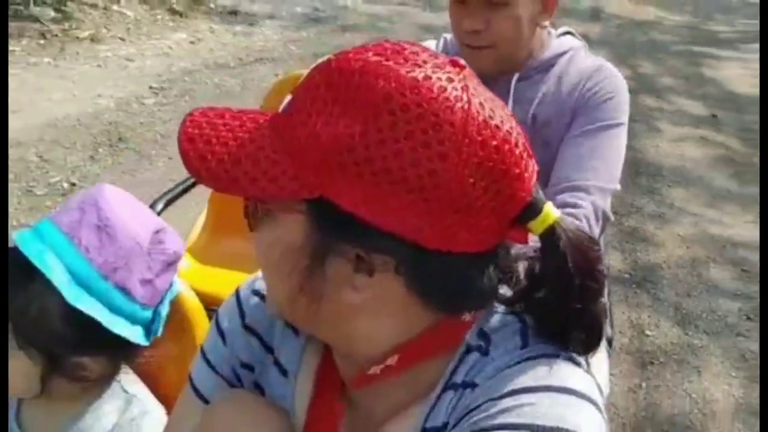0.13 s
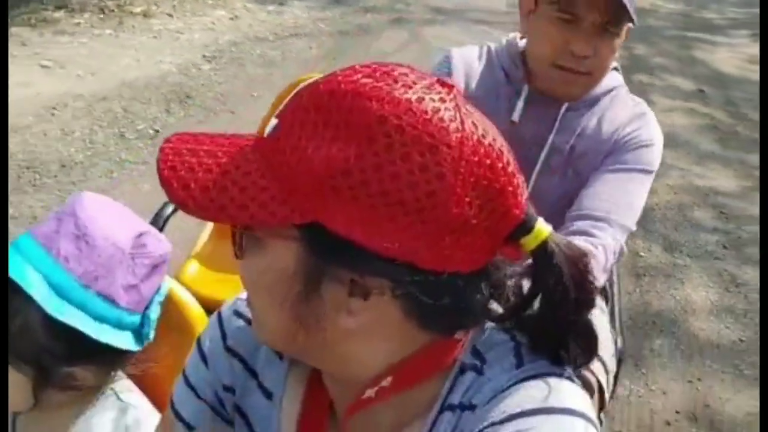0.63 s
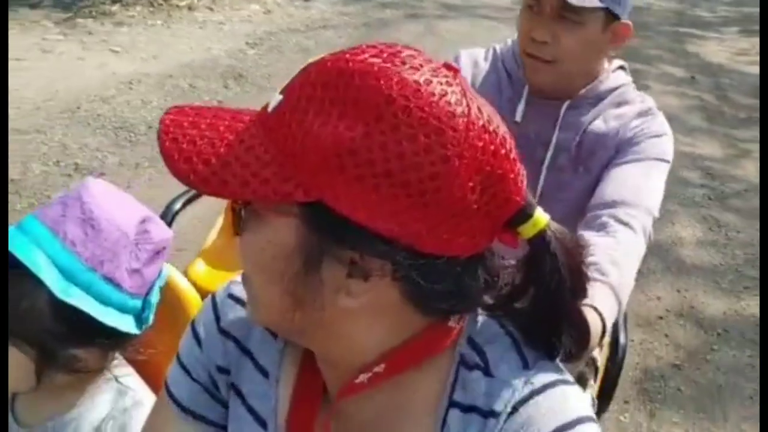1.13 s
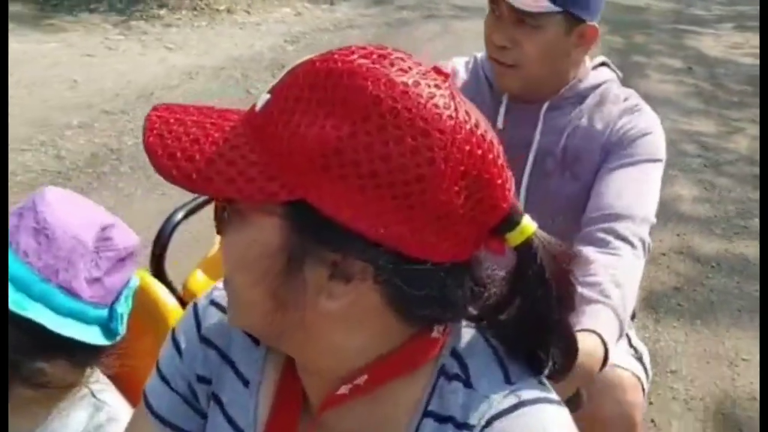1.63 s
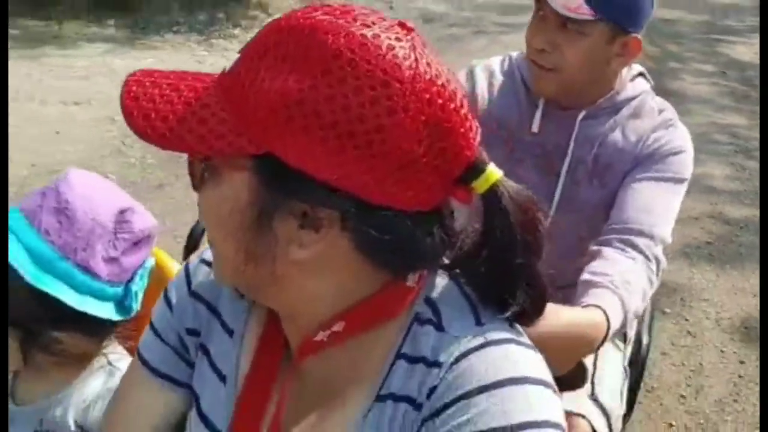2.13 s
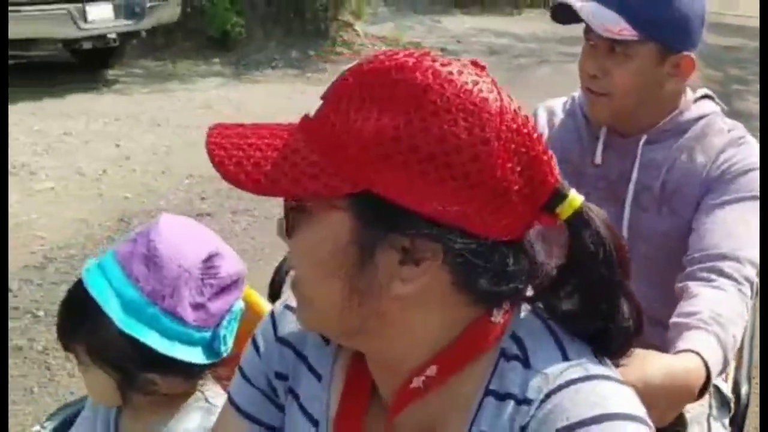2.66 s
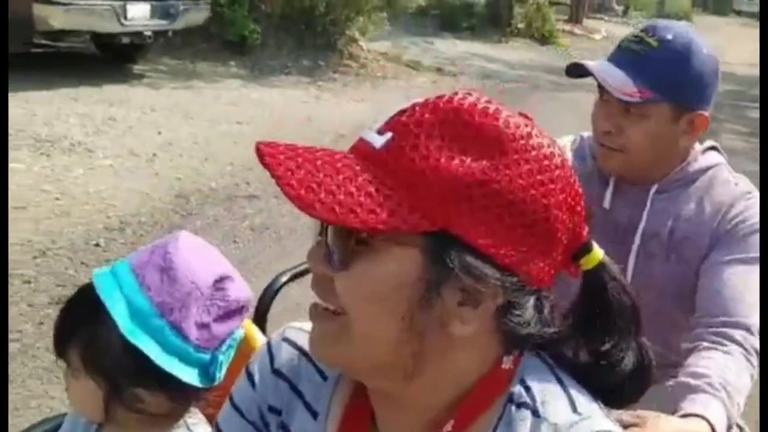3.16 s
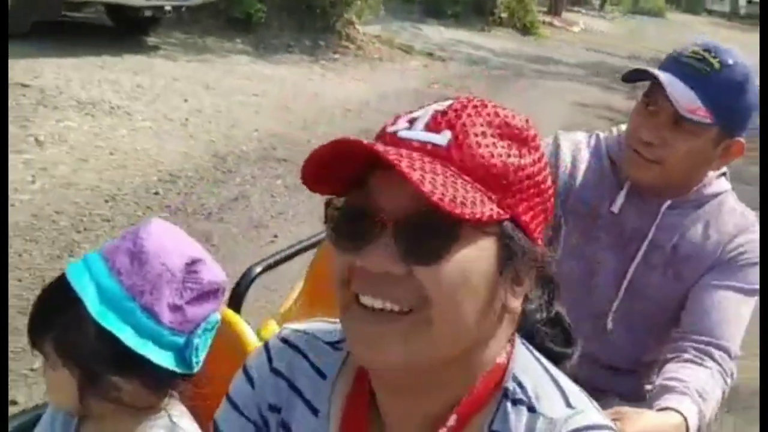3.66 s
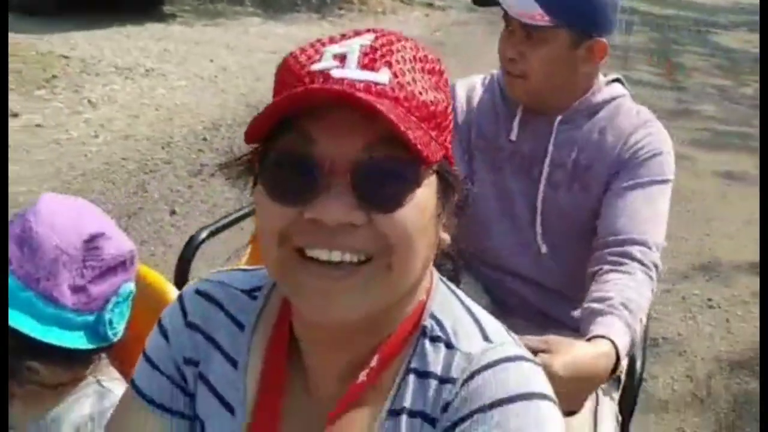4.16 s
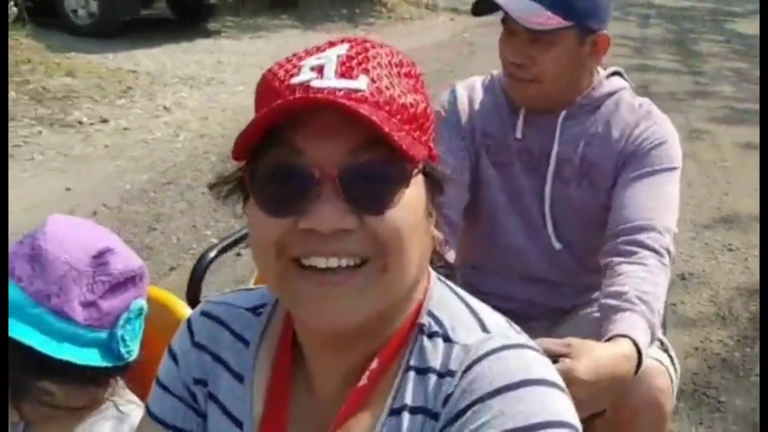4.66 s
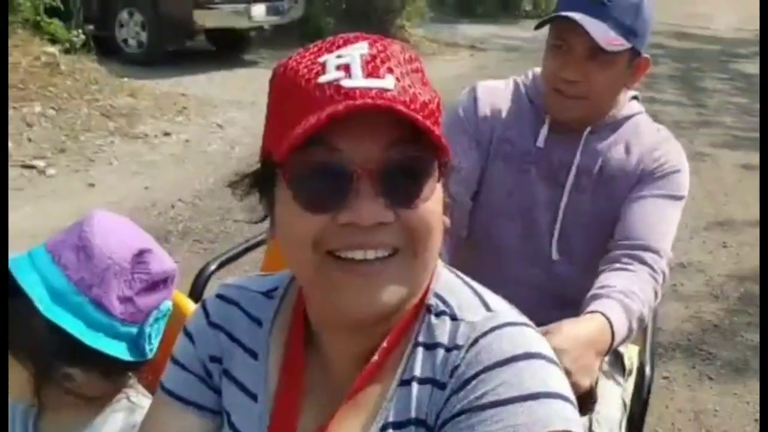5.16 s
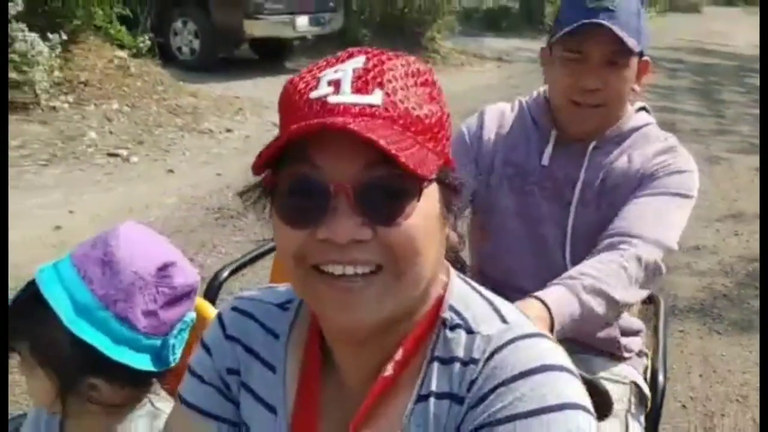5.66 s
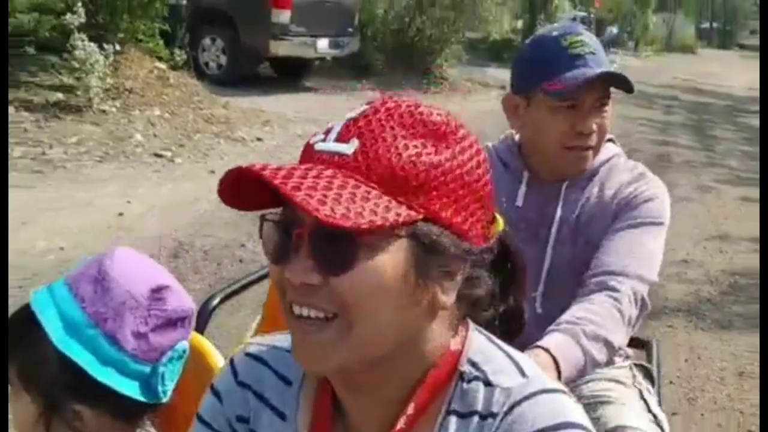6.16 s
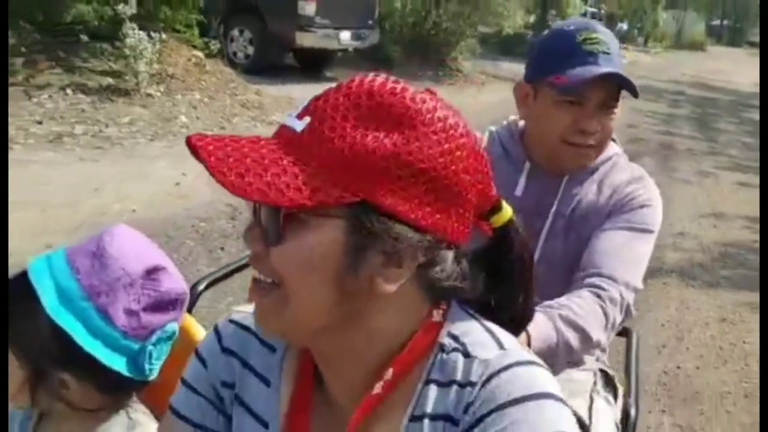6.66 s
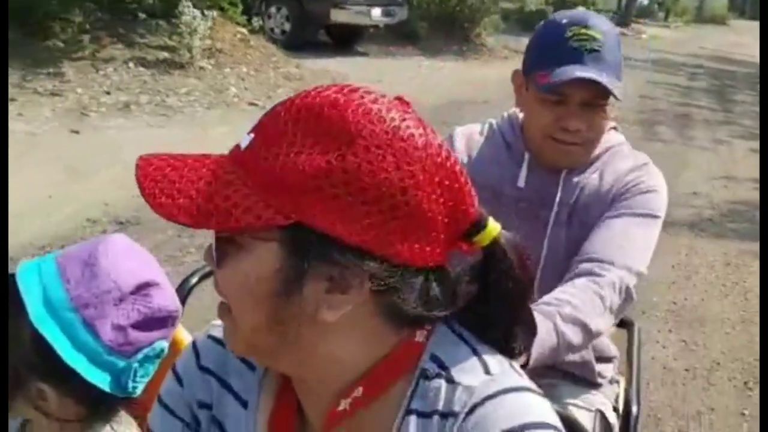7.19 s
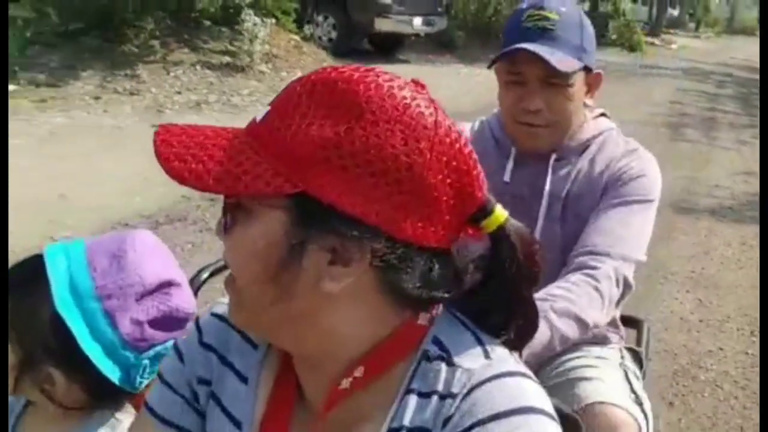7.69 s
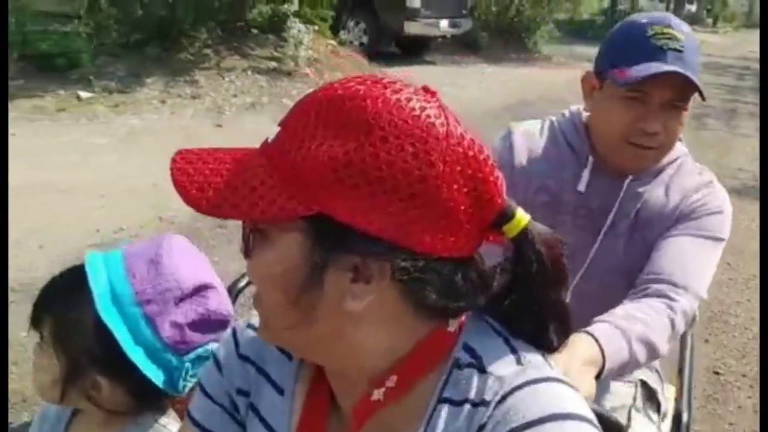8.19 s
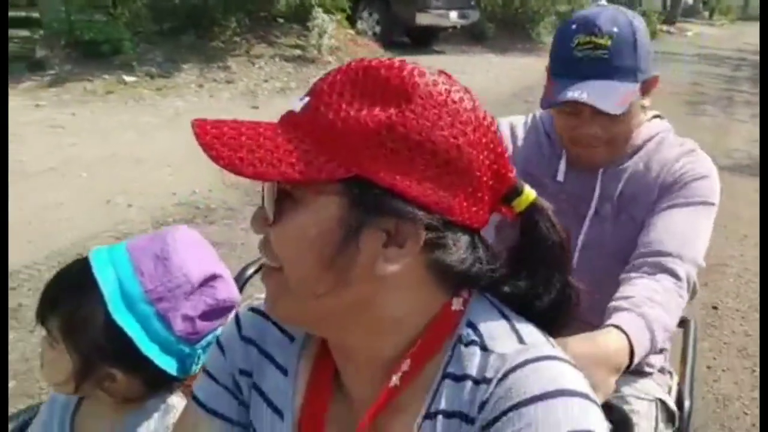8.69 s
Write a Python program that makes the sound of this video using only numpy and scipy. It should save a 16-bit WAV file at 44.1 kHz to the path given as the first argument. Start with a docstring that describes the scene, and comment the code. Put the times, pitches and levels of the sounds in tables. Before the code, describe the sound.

Heard on board a pedal cart in open air, tyres grind softly over gravel with a fine steady crunch. Stones pop and knock, and loose metal rattles lightly at first. Thin high squeaks return about every second and a half. After five seconds the clanks become harder and wind thumps the handheld microphone, mostly on the left. A clear squeal comes near the end, followed by more heavy rattles.

```python
"""Pedal cart on a gravel road

A pedal cart rolls over gravel in open air, heard close, from a hand-held phone on board. Tyres press noise
and damped pings out of the stones, larger stones pop, loose parts rattle and ring over bumps, and dry joints
squeak by stick-slip. Wind, low lumpy noise and short thumps, buffets mostly the left microphone.
The right channel arrives about 4 ms late, and the top of the treble comes and goes."""
import sys
import numpy as np
from scipy import signal
from scipy.fft import rfft, irfft, next_fast_len
from scipy.io import wavfile
from scipy.ndimage import uniform_filter1d, map_coordinates

SR = 44100
rng = np.random.default_rng(int(sys.argv[2]) if len(sys.argv) > 2 else 0)


def put_to_file(sound):
    """Save the sound as 16-bit audio at rate SR, in the file named by the first command-line argument."""
    columns = np.atleast_2d(sound).T  # one column per channel
    safe = np.clip(columns, -1, 1)
    whole_steps = np.round(safe * 32767)
    wavfile.write(sys.argv[1], SR, whole_steps.astype(np.int16))


def volts(x):
    """Linear amplitude factor 10**(x/20) for a level x in dB, scalar or array-like."""
    e = np.asarray(x, float) / 20
    return 10 ** e


N = 388962
T = np.arange(N) / SR


def unit(x):
    """Scaled to rms 1."""
    return x / np.sqrt(np.mean(x ** 2) + 1e-20)


def along(points, hz):
    """(Hz, value) points read on a log frequency axis."""
    point_hz, value = np.transpose(points)
    return np.interp(np.log(hz + 1), np.log(point_hz + 1), value)


def wobble(rate):
    """A smooth random curve, rate knots a second."""
    knots = rng.standard_normal(int(N * rate / SR) + 4)
    return map_coordinates(knots, [T * rate])


def filtered(x, response):
    """x times a complex response of frequency."""
    m = next_fast_len(N + 8192)
    return irfft(rfft(x, m) * response(np.fft.rfftfreq(m, 1 / SR)), m)[..., :N]


def rush(spectrum, alike, patchy_db):
    """Two-channel noise of rms 1, partly shared between the microphones, in narrow patches of random gain."""
    z = signal.stft(rng.standard_normal((2, N)), nperseg=512)[2]
    field = uniform_filter1d(rng.standard_normal(z.shape[1:]), size=3, axis=0)
    field = uniform_filter1d(field, size=6, axis=1)
    pair = signal.istft(z * volts(patchy_db * unit(field)), nperseg=512)[1][:, :N]

    def mid_side(hz):
        turn = np.arccos(np.clip(along(alike, hz), 0, 1)) / 2  # this split makes the correlation equal alike
        return volts(along(spectrum, hz)) * [np.cos(turn), np.sin(turn)]

    mid, side = filtered(pair, mid_side)
    return unit(np.array([mid + side, mid - side]))


def add(track, s, sound):
    """Mixes a short sound in at time s."""
    i = int(np.clip(round(s * SR), 0, N))
    track[..., i:i + sound.shape[-1]] += sound[..., :N - i]


def panned(db):
    """Gains of the two channels for a left-right difference."""
    return volts([[db / 2], [-db / 2]])


def pings(s, db, hz, cycles, pan_db):
    """Damped sines, one per stone; each microphone hears its own slightly different pitch."""
    t = np.arange(560) / SR
    out = np.zeros((2, N + len(t)))
    start = np.clip(s * SR, 0, N - 1).astype(int)
    at = (start[:, None] + np.arange(len(t))).ravel()
    detune = 1 + 0.045 * rng.standard_normal((len(s), 2))
    for c in (0, 1):
        turns = (hz * detune[:, c])[:, None] * t
        shape = np.sin(2 * np.pi * turns) * np.exp(-turns / cycles[:, None]) * (1 - np.exp(-3 * turns))
        gain = volts(db + (.5 - c) * pan_db)[:, None]
        out[c] = np.bincount(at, (gain * shape).ravel(), N + len(t))
    return out[:, :N]


def scattered(count, rolling_db, db, hz, cycles):
    """Random pings that follow the rolling level: many small, few large."""
    draw, when = rng.standard_normal((count, 3)), rng.random((count, 2))
    at = when[:, 0] * N / SR
    size_db = np.interp(at, T, rolling_db) + db - 2.53 * np.log(1.01 - when[:, 1])
    pitch_hz = np.minimum(hz * np.exp(.55 * draw[:, 0]), 8400)
    return pings(at, size_db, pitch_hz, cycles * np.exp(0.34 * draw[:, 1]), 1.8 * draw[:, 2])


# Tyres on the gravel. Each row: time in seconds, mean drone level in dB, mean fine crunch level in dB.
ROLLING = [(0.0, -45, -51), (0.37, -49, -50), (0.6, -45, -49), (0.9, -51, -53), (1.4, -52, -51),
           (2.0, -48, -54), (2.18, -46, -47), (2.35, -52, -55), (3.1, -49, -52), (3.4, -51, -54),
           (3.75, -48, -49), (4.0, -50, -52), (4.4, -46, -49), (4.6, -49, -51), (5.2, -49, -46),
           (5.6, -46, -50), (5.9, -49, -53), (6.6, -48, -51), (7.2, -52, -51), (7.38, -44, -47),
           (7.55, -50, -53), (8.1, -43, -47), (8.65, -49, -54), (8.82, -41, -49)]
# Spectra of the tyre drone and the fine crunch. Each row: frequency in Hz, relative level in dB per Hz.
DRONE_SPECTRUM = [(71, -70), (125, -11), (190, -3), (288, -2), (506, 1.5), (608, -15), (983, -2.5),
                  (1120, -6.5), (1700, -2), (3500, -38), (4550, -66), (7700, -120)]
CRUNCH_SPECTRUM = [(880, -15), (1500, -2.5), (1720, -18), (2140, -7.5), (2780, -4.5), (3500, -8.5),
                   (5510, -15.5), (8150, -7), (9260, -46.5), (10300, -18), (11800, -29), (12600, -53),
                   (13200, -71)]
# Likeness of noise at the two microphones. Each row: frequency in Hz, correlation from 0 to 1.
ALIKENESS = [(100, 0.9), (300, 1), (600, 0.46), (1200, 0.1), (2500, 0.47), (6000, 0.45), (12000, 0.4)]


def gravel():
    """Tyres press the stones: a lumpy drone, a fine crunch, small pops, and faint tinkles of shaken metal."""
    s, drone_db, crunch_db = np.transpose(ROLLING)
    bumps = wobble(13)
    drone_db = np.interp(T, s, drone_db) + 1.4 * bumps
    crunch_db = np.interp(T, s, crunch_db) + 0.5 * bumps
    drone = volts(drone_db + 2.36 * wobble(60)) * rush(DRONE_SPECTRUM, ALIKENESS, patchy_db=4.5)
    crunch_gain = volts(crunch_db + 1.75 * wobble(30) + 0.5 * wobble(300))
    crunch = crunch_gain * rush(CRUNCH_SPECTRUM, ALIKENESS, patchy_db=4.5)
    clumps_db = drone_db + 2.1 * wobble(5.8)
    stones = scattered(count=1600, rolling_db=clumps_db, db=1.0, hz=1100, cycles=3.0)
    tinkles = scattered(count=900, rolling_db=crunch_db, db=-8.0, hz=4017, cycles=42)
    return drone + crunch + stones + tinkles


# Steady wind on the microphones. Each row: time in seconds, buffet level in dB before lumps and panning.
STEADY_WIND = [(0.0, -75), (1.0, -77), (1.7, -80), (2.4, -74), (2.9, -71), (3.6, -79), (4.0, -70),
               (4.3, -57), (4.6, -71), (5.0, -64), (5.3, -56), (5.9, -62), (6.5, -54), (6.9, -62),
               (7.15, -62), (7.5, -57), (8.0, -65), (8.82, -68)]
# Puffs of wind. Each row: thump start in seconds, nominal level in dB, thump pitch in Hz,
# hold of the roar in seconds.
WIND_PUFFS = [(3.174, -43, 78.1, .04), (4.198, -41, 126, .1), (5.127, -38, 124, .05),
              (5.232, -33, 159, .05), (5.309, -29.5, 88, .04), (5.465, -38, 137, .08),
              (5.975, -45, 242, .03), (6.147, -26, 200, .04), (6.182, -31, 158, .04), (6.35, -46, 110, .04),
              (6.461, -33, 99.6, .05), (6.548, -35, 154, .07), (6.99, -46, 110, .03),
              (7.215, -39, 104, .06), (7.41, -42, 110, .04), (7.485, -39, 110, .03), (7.57, -42, 125, .05),
              (7.791, -41, 113, .12), (8.222, -33, 135, .05), (8.39, -44, 110, .05), (8.54, -48, 110, .04)]
# Spectrum of the buffeting. Each row: frequency in Hz, relative level in dB per Hz.
BUFFET_SPECTRUM = [(12, -53), (20, -6), (92, 7), (130, 1), (225, -4), (253, -1), (350, -20.5), (460, -46),
                   (770, -120)]
ROAR_DB, ROAR_RISE_S, ROAR_FALL_DB_PER_S = -13, .015, 500  # roar re nominal puff level, its swell and fall


def wind():
    """Air tumbles over the ports in lumps, nearly unrelated left and right; puffs roar and thump the left one."""
    strength = volts(np.interp(T, *np.transpose(STEADY_WIND)) + 3.5 * wobble(12))
    t = np.arange(SR // 3) / SR
    thumps = np.zeros(N)
    for s, db, hz, hold_s in WIND_PUFFS:
        swing = np.sin(2 * np.pi * hz * t) * hz * t * np.exp(1 - 1.6 * hz * t)
        add(thumps, s, volts(db + 13) * swing)
        fall_db = ROAR_FALL_DB_PER_S * np.maximum(t - ROAR_RISE_S - hold_s, 0)
        roar = np.minimum(t / ROAR_RISE_S, 1) * volts(db + ROAR_DB - fall_db)
        add(strength, s - ROAR_RISE_S, roar)
    lumps = volts(3.2 * np.array([wobble(35), wobble(35)]))
    noise = unit(lumps * rush(BUFFET_SPECTRUM, [(50, 0.092)], patchy_db=0.5))
    return strength * noise * panned(14.2) + thumps * [[1], [.15]]


def ringing(modes, t):
    """Modes at new strengths for each blow; each is a close pair that beats, heard differently left and right."""
    ring = np.zeros((2, len(t)))
    for hz, db, t60 in modes:
        split, turn = 1 + 0.0204 * rng.standard_normal(), 2 * np.pi * rng.random((2, 1))
        pair = np.sin(2 * np.pi * hz * t) + 1.32 * np.sin(2 * np.pi * hz * split * t + turn)
        ring += volts(db + rng.normal(0, 1.2) - 60 * t / t60) * pair
    ending = np.minimum(1, 8 - 8 * t / t[-1])
    return (1 - np.exp(-t / 0.0047)) * ending * ring


# Clanks of loose parts. Each row: start in seconds, nominal level in dB, then body, sizzle and hollow boom
# in dB re that level, all before the trims of the layers.
CLANK_BLOWS = [(0.003, -31, -6, -26, -10), (0.3526, -48, 7, -1, -20), (0.6868, -26, -5.5, -15, -6.5),
               (0.999, -43, 1, -5.5, -3), (1.0505, -36, -2, -12, -6.5), (1.0885, -41, 4, -10, -4),
               (1.1278, -46, -9, 3.5, -10), (1.3349, -49, 2, 4, -26), (1.4586, -39, 5.5, -18, -21),
               (1.5572, -29.5, 0, -11, -6), (1.6526, -54, -10, 12, -11), (1.9644, -38, -3, -20, -10),
               (2.1203, -41, -10, -6, -12), (2.3421, -49, 2, 5, -8), (2.9991, -32.5, -11, -16, -31),
               (3.1188, -31.5, -22, -11, -36), (3.261, -36.5, -6, -35, -28), (3.3164, -33, -13, -29, -40),
               (3.7477, -21, -24, -14, -27.5), (3.902, -43, -1, -1.5, -8), (4.2103, -21, -16, -8, -30),
               (4.6089, -34, -7.5, -17, -39), (5.018, -36, -8, -20, -30), (5.0449, -32, -15, -16, -35),
               (5.0922, -19, -18, -6, -42), (5.17, -33, -8, -14, -20), (5.2011, -13, -6, -10.5, -24),
               (5.4788, -22, -12.5, -15, -16), (5.52, -29, -21, -12.5, -22), (5.5727, -30, -12, -23, -13.5),
               (5.682, -15.5, -2, -7.5, -19.5), (5.8153, -46, 2, 1.5, -26), (6.154, -24.5, -18, -18.5, -23),
               (6.327, -49, 5, 3, -10), (6.4647, -34.5, -14, -24, -12), (6.5574, -34, 1, -12, -11),
               (6.5965, -13.5, -5, -10, -21.5), (6.7511, -19.5, -16, -13, -25),
               (6.796, -24, -11.5, -34, -40), (7.2868, -42, 1, -9, -5), (7.3727, -26.5, -21, -17, -15),
               (7.9119, -15, -7, -10.5, -27), (8.0222, -24.5, -11, -18.5, -19),
               (8.2015, -31, -18, -20, -17), (8.2861, -14, -5, -9, -20), (8.4502, -39.5, -5, -3.5, -31),
               (8.6273, -34, -5.5, -14.5, -0.5), (8.6966, -44, 0, 1.5, -5),
               (8.7364, -19.5, -14.5, -21, -20)]
# Spectrum of the rattling metal. Each row: frequency in Hz, relative level in dB per Hz.
CLANK_SPECTRUM = [(88, -40), (150, -18.5), (376, -13.5), (536, -6), (647, -16), (810, -13), (906, -7.5),
                  (2230, -11), (2400, -5.5), (2950, -12), (3830, -8), (6200, -22), (7390, -22.5),
                  (8910, -31), (11800, -41), (13200, -90)]
# Long-ringing modes of the frame. Each row: frequency in Hz, mean relative level in dB, t60 in seconds.
FRAME_MODES = [(536, -8, 0.26), (579, -15.5, 0.46), (720, -7.5, 0.26), (790, -12, 0.5), (1030, -5, 0.18),
               (1320, -10, 0.28), (2416, -14.5, .2), (3940, -14, 0.14), (4940, -22, .12)]
# Modes of the hollow seat shell. Each row: frequency in Hz, mean relative level in dB, t60 in seconds.
SHELL_MODES = [(289.7, -1, 0.45), (326, -0.5, .5)]
# t60 of a rattle before each band stretches it; more body and lighter jolts rattle longer
RATTLE_S, HEAVY_S_PER_DB, SOFT_S_PER_DB = .25, .003, .003
SHAKE_S = .005  # the fall of a rattle starts this long after the blow


def clanks():
    """Each jolt shakes loose metal: dense rattle dying band by band, while frame and seat shell ring on."""
    t = np.arange(SR // 4) / SR
    body, edge, sizzle = np.zeros((3, N))
    rings = np.zeros((2, N))
    for s, db, body_db, sizzle_db, boom_db in CLANK_BLOWS:
        life = np.clip(RATTLE_S + HEAVY_S_PER_DB * body_db - SOFT_S_PER_DB * (db + 20), .03, .5)
        rise = .0012 * volts(-.3 * (db + 16))  # light jolts swell more slowly than hard blows

        def envelope(stretch):
            fall_db = 60 * np.maximum(t - SHAKE_S, 0) / (stretch * life)
            return volts(db - fall_db) * (1 - np.exp(-t / rise))

        add(body, s, volts(body_db - 4.0) * envelope(1.27))  # low parts ring longer
        add(edge, s, volts(-10.5) * envelope(1.214))
        add(sizzle, s, volts(sizzle_db + 5.0) * envelope(0.69))
        frame = volts(db + body_db - 4.0) * ringing(FRAME_MODES, t)
        shell = volts(db + boom_db - 4.5) * ringing(SHELL_MODES, t)
        add(rings, s, frame + shell)
    metal = volts(2.4 * wobble(350) + 1.2 * wobble(60)) * rush(CLANK_SPECTRUM, ALIKENESS, patchy_db=4.0)
    below_1660 = filtered(metal, lambda hz: 1 / (1 + (hz / 1660) ** 6))
    below_6600 = filtered(metal, lambda hz: 1 / (1 + (hz / 6600) ** 6))
    rattle = body * unit(below_1660) + edge * unit(below_6600 - below_1660) + sizzle * unit(metal - below_6600)
    return rattle + rings


# Larger stones popping under the tyres. Each row: start in seconds, nominal level in dB, nominal pitch in Hz,
# left-right difference in dB before a shared shift to the right.
STONE_POPS = [(0.062, -30, 1100, 0), (0.15, -31, 487, 0), (0.307, -30, 1030, 3.5), (0.375, -30, 1200, 0),
              (0.383, -20, 1130, -1), (0.661, -24, 800, 3.0), (0.688, -19, 1600, 1.5),
              (0.705, -24, 1300, 2), (0.718, -22, 420, 2), (0.949, -33, 716, 2), (1.067, -28.5, 1020, 1),
              (1.14, -27, 980, 4), (1.453, -31.5, 711, 6), (1.563, -30, 783, 0), (1.757, -33, 990, 9),
              (1.945, -28, 1700, 10), (1.982, -30.5, 527, 2), (2.035, -33, 1670, 9),
              (2.078, -26.5, 1550, 5), (2.209, -30, 1300, 4), (2.231, -31, 714, 3), (2.357, -31, 980, 4.5),
              (2.877, -30, 1500, 11), (3.135, -32, 1350, 7), (3.171, -31.5, 990, 1), (3.202, -26, 1650, 9),
              (3.261, -29.5, 1550, 5.0), (3.316, -21, 1900, 8), (3.52, -34, 720, 3), (3.805, -32, 523, 4),
              (4.09, -27, 810, 4.5), (4.429, -25, 1100, 4), (4.438, -13, 1170, 4), (4.602, -28, 1700, 0),
              (4.647, -25, 1040, 0), (5.019, -32.5, 750, 0), (5.201, -18.5, 540, 4),
              (5.48, -30.5, 1530, -5), (5.681, -15.5, 910, -5), (5.916, -33.5, 930, 7.5),
              (6.003, -28, 1770, 4), (6.232, -29.5, 960, 4.0), (6.327, -27, 1030, 4.5),
              (6.363, -30, 1030, 3), (6.597, -17, 560, 3.5), (6.8, -22, 2480, -3), (6.969, -31, 1330, 1),
              (7.03, -34, 1510, 8), (7.099, -32, 1470, 8.5), (7.228, -24, 1780, 5.5), (7.24, -27, 1700, 5),
              (7.282, -23, 1580, 0), (7.912, -19, 1100, 3), (8.023, -24.5, 1330, 6), (8.246, -31, 1680, 6),
              (8.288, -25, 545, -5), (8.462, -28, 1300, 0), (8.614, -32, 1310, 5.0),
              (8.735, -22.5, 1340, -3), (8.812, -19, 1280, 3)]
SMALL_POP_DB, SMALL_SPREAD_DB = -39, 3  # lesser stones at random times: mean nominal level and its spread
TICK_DB = -4  # the sharp crack of a stone re its nominal level


def pops():
    """Larger stones slip out from under a tyre: a short pitched knock and crack, then a spray of chips."""
    when, draw = rng.random((60, 2)), rng.standard_normal((60, 2))
    modes_hz = np.transpose(FRAME_MODES)[0][:6]  # small stones knock at a pitch of the frame
    small_hz = modes_hz[(6 * when[:, 1]).astype(int)]
    small_db = SMALL_POP_DB + SMALL_SPREAD_DB * draw[:, 0]
    small = [when[:, 0] * N / SR, small_db, small_hz, 5 + 4 * draw[:, 1]]
    s, db, hz, pan_db = np.hstack([np.transpose(STONE_POPS), small])
    knocks = pings(s, db + 4.5, hz, np.full(len(s), 2.1), pan_db - 5.0)
    out = knocks + pings(s, db + TICK_DB, 2.3 * hz, np.full(len(s), .7), pan_db - 4.0)
    chips = rng.standard_normal((len(s), 5, 3))  # five chips a stone
    for late, tune, size in chips.T.swapaxes(0, 1):
        chip_hz = 1.35 * hz * np.exp(0.46 * tune)
        chip_s = s + .007 * abs(late)
        out = out + pings(chip_s, db - 4.5 + 2 * size, chip_hz, np.full(len(s), 2.2), pan_db - 3.0)
    return out


SWELL_S, QUIET_DB = .014, 27  # a stretch of tone swells from this far under its level and fades back to it


def stretch_rows(s, hold_s, hz, db, fade_db_per_s):
    """Rows of one stretch of tone (s, Hz, dB): swell, hold, fade."""
    end = s + hold_s
    gone = end + QUIET_DB / fade_db_per_s
    return [(s - SWELL_S, hz, db - QUIET_DB), (s, hz, db), (end, hz, db), (gone, hz, db - QUIET_DB)]


def squeak(tables, overtones_db, rough, flutter_hz, pan_db, lead):
    """Stick-slip in a dry joint: harmonics of unsteady size and pitch; the right side leads by some radians."""
    out = np.zeros((2, N))
    drift = rough * wobble(flutter_hz)
    flutter_db = np.minimum(9 * rough, 4) * wobble(flutter_hz)
    for rows in tables:
        s, hz, db = np.transpose(rows)
        near = (T > s[0] - .004) & (T < s[-1] + .01)
        t = T[near]
        gate = np.interp(t, [s[0] - .004, s[0], s[-1], s[-1] + .01], [0, 1, 1, 0])
        turns = np.cumsum(np.interp(t, s, hz)) / SR + rng.random()
        phase = 2 * np.pi * turns + drift[near] + [[0], [lead]]
        tone = sum(volts(level) * np.sin((k + 1) * phase) for k, level in enumerate(overtones_db))
        out[:, near] += gate * volts(np.interp(t, s, db) + 8.5 + flutter_db[near]) * tone
    return panned(pan_db) * out


# Thin crank squeaks, two slips each. Each row: first slip in seconds, second slip in seconds,
# pitch of the first slip in Hz, nominal level of the first in dB, nominal level of the second in dB.
CRANK_SLIPS = [(1.168, 1.225, 7820, -45, -46), (2.612, 2.672, 7830, -40, -34),
               (4.036, 4.09, 7790, -40, -39), (5.66, 5.685, 7700, -40, -50), (7.156, 7.215, 7830, -41, -38)]
CRANK_HOLD_S, CRANK_FADE_DB_PER_S, SECOND_UP_HZ = .028, 600, 50


def crank_squeaks():
    """The crank joint sticks and slips twice once a crank turn: thin near-sines, the second a little higher."""
    slips = []
    for first, second, hz, first_db, second_db in CRANK_SLIPS:
        slips.append(stretch_rows(first, CRANK_HOLD_S, hz, first_db, CRANK_FADE_DB_PER_S))
        slips.append(stretch_rows(second, CRANK_HOLD_S, hz + SECOND_UP_HZ, second_db, CRANK_FADE_DB_PER_S))
    return squeak(slips, [0], rough=0.31, flutter_hz=110, pan_db=1.5, lead=.6)


# Fuller joint squeals at 2.78 and 7.41 s, each in overlapping stretches as it dies away.
# Each row: end of the swell in seconds, hold in seconds, pitch in Hz, nominal level in dB.
SQUEAL_STRETCHES = [(2.782, .028, 3910, -42), (2.82, .03, 3880, -53), (7.41, .028, 4020, -21),
                    (7.449, .012, 4030, -28), (7.49, .005, 3990, -37), (7.516, .022, 4020, -40),
                    (7.565, .02, 4000, -52), (7.61, .04, 4020, -58)]


def squeals():
    """Two joint squeals, the second louder; each is a tone with two weak overtones that fades unevenly."""
    stretches = [stretch_rows(*row, fade_db_per_s=1200) for row in SQUEAL_STRETCHES]
    return squeak(stretches, [0, -19, -41], rough=0.24, flutter_hz=132, pan_db=-2.0, lead=2.0)


# One rough creak, a single gliding curve. Each row: time in seconds, pitch in Hz, nominal level in dB.
CREAK_CURVE = [(4.28, 1380, -52), (4.303, 1550, -46), (4.345, 1575, -50), (4.375, 1550, -43),
               (4.39, 1420, -37), (4.405, 1410, -38), (4.43, 1420, -46), (4.49, 1450, -60)]


def creak():
    """One longer creak with fast, rough flutter, its second harmonic the strongest."""
    return squeak([CREAK_CURVE], [-9, 0, -5], rough=.45, flutter_hz=300, pan_db=-2.5, lead=0)


def scene():
    """Everything on the cart, close and in open air."""
    return gravel() + wind() + clanks() + pops() + crank_squeaks() + squeals() + creak()


def without_weak_treble(x, edge_hz, open_db):
    """Bands above edge_hz drop out wherever they are weaker than a threshold, so the top comes and goes."""
    hz, _, z = signal.stft(x, SR, nperseg=512)
    power = uniform_filter1d(np.mean(abs(z) ** 2, axis=0), size=5, axis=0)
    power = uniform_filter1d(power, size=3, axis=1)
    kept = 1 / (1 + (volts(open_db) ** 2 / (abs(power) + 1e-20)) ** 4)
    return signal.istft(z * np.where(hz[:, None] > edge_hz, kept, 1), SR, nperseg=512)[1][:, :N]


def top_cut(x):
    """Nothing passes above the cut-off."""
    return signal.sosfilt(signal.butter(12, 13350, fs=SR, output="sos"), x)


# Colour of both microphones. Each row: frequency in Hz, gain in dB.
MIC_COLOUR = [(30, -7), (70, -2.5), (150, -1.5), (8500, -1), (9300, -25), (10300, -9), (11200, 1),
              (12300, 3)]
# Left-right sensitivity of the microphones. Each row: frequency in Hz, left over right in dB.
SIDE_BALANCE = [(100, -1.5), (400, 5), (1500, 3.3), (4000, 5.5), (8000, -1.5), (12000, -1)]
LAG_S = .0039  # delay of the right channel behind the left


def record(dry):
    """The two microphones differ in colour, and left runs ahead of right; the top of the treble comes and goes."""
    def half(hz):
        return volts(along(SIDE_BALANCE, hz) / 2) * np.exp(1j * np.pi * hz * LAG_S - .3j)

    ports = filtered(dry, lambda hz: volts(along(MIC_COLOUR, hz)) * np.array([half(hz), 1 / half(hz)]))
    thinned = without_weak_treble(ports, edge_hz=8600, open_db=-86)
    rounded = thinned / (1 + abs(thinned / 0.59) ** 3) ** (1 / 3)  # the input stage rounds off the loudest peaks
    return top_cut(rounded)


dry = scene()
out = record(dry)
put_to_file(out)
```